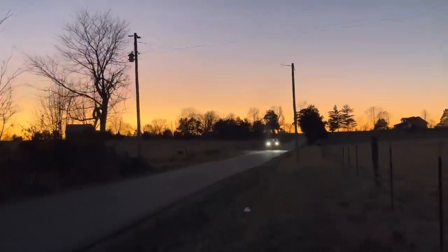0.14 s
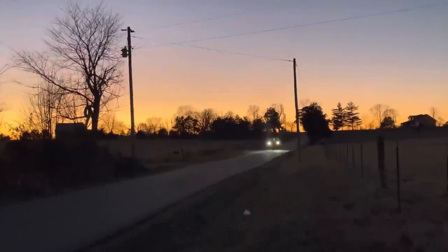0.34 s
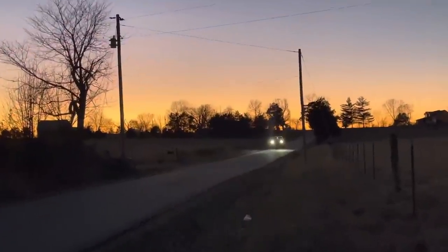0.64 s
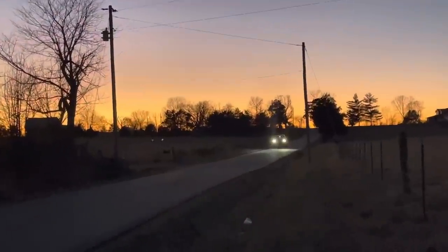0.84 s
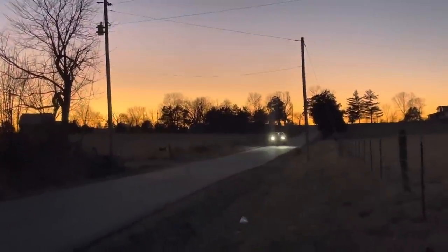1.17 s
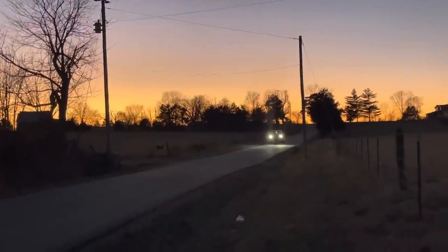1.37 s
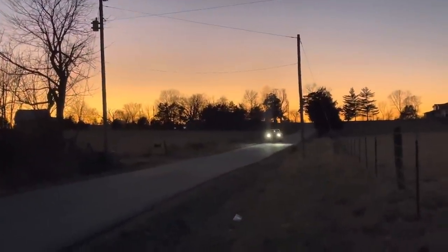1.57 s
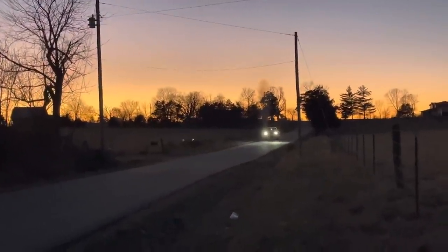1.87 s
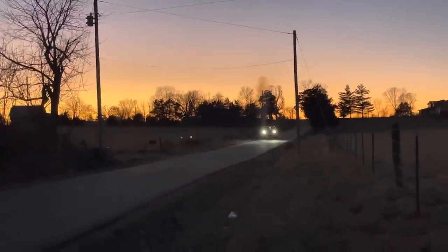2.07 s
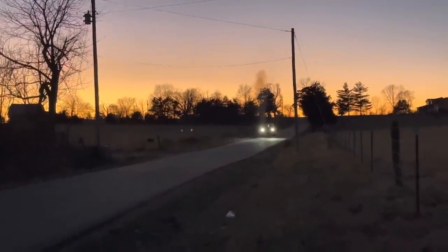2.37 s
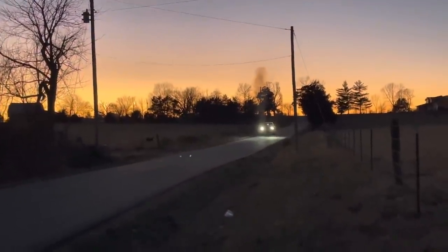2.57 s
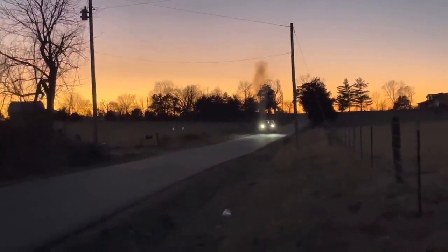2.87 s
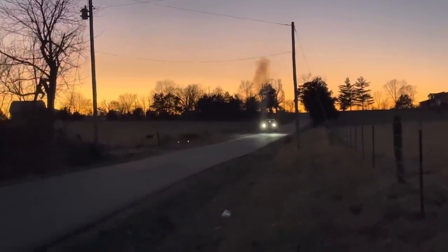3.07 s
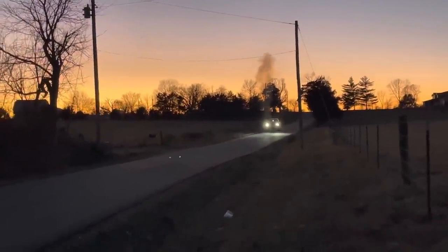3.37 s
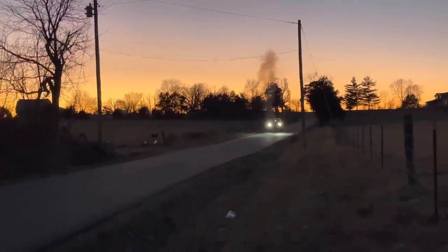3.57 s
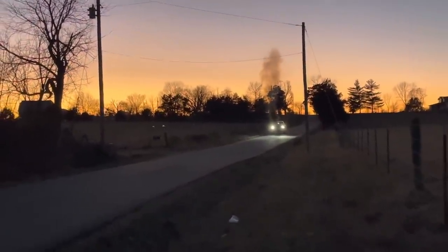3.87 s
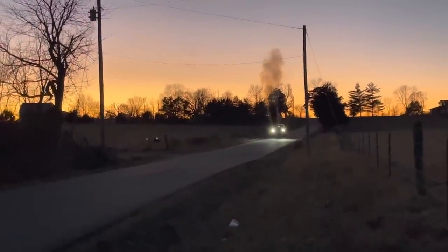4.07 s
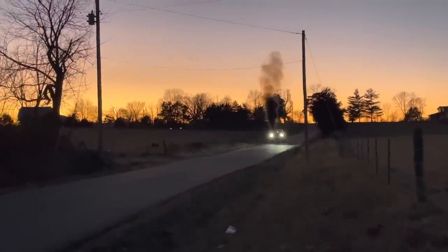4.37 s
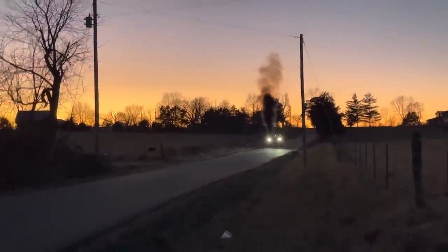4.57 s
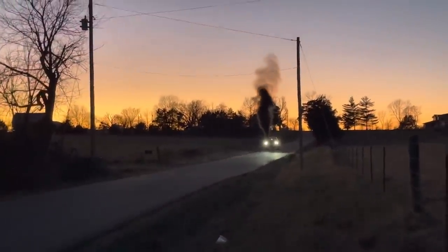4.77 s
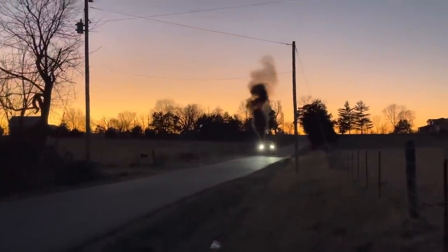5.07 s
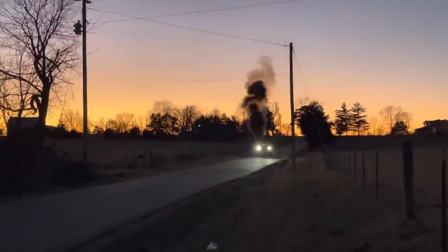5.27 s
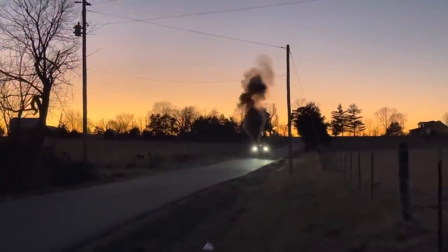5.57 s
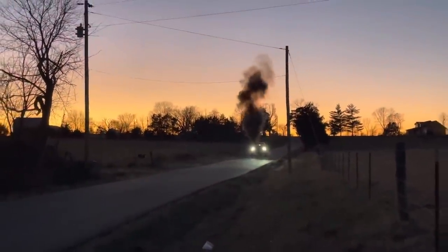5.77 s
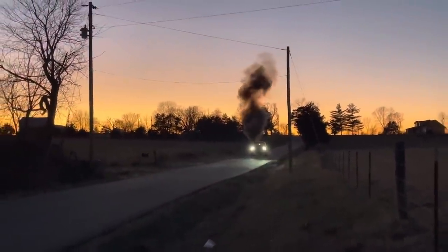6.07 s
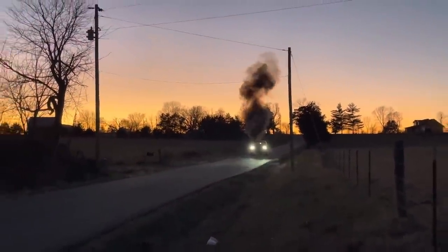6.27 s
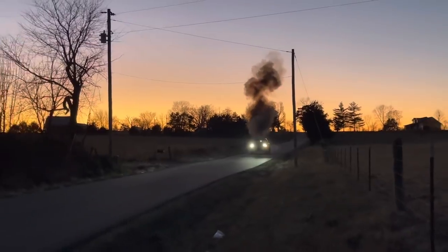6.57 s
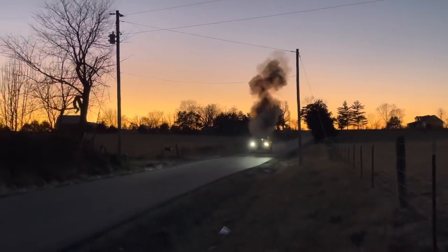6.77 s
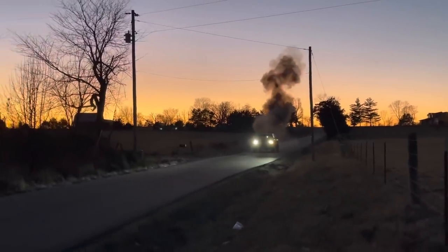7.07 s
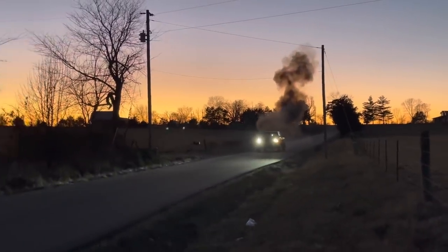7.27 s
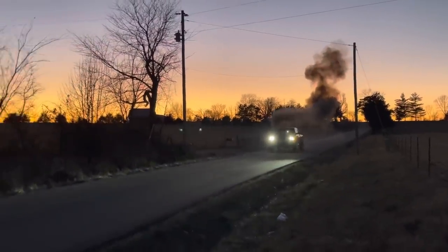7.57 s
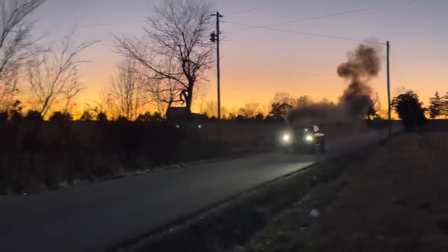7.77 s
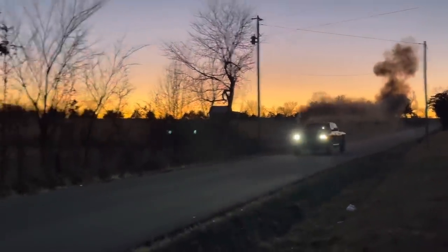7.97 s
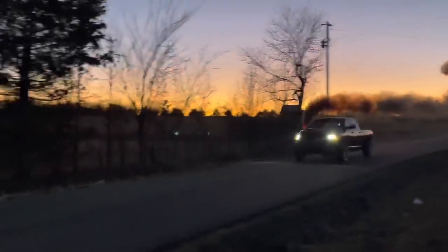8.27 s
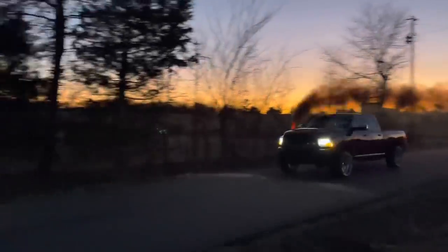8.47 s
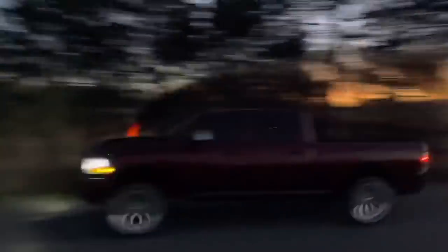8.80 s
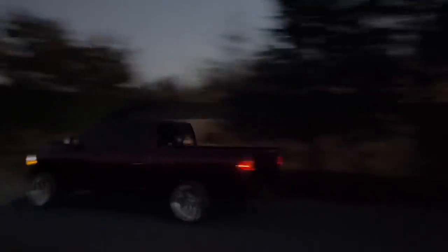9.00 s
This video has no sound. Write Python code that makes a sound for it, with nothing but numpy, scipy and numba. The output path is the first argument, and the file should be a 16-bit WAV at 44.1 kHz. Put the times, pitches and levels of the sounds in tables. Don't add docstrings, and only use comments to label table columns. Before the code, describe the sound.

A rough six-cylinder diesel works up through its revs across an open field, over low air rumble. Small bright clicks of dry grass come early, then a rising turbo whistle and harsh, breathy exhaust. After a mid-course gear dip the engine pulls harder, brighter and closer, colored by a sweeping road echo. It rushes by the phone, drops in pitch and level, and cuts to a dull tail.

```python
import sys
import numpy as np
from scipy import signal
from scipy.fft import rfft, irfft, next_fast_len
from scipy.io import wavfile
from scipy.ndimage import uniform_filter1d
from numba import njit

SR = 44100
rng = np.random.default_rng(int(sys.argv[2]) if len(sys.argv) > 2 else 0)


def amplitude_ratio(level_db):
    exponent = np.asarray(level_db, float) / 20
    return 10 ** exponent


def unload_audio(sound):
    columns = np.transpose(np.atleast_2d(sound))
    steps = np.round(np.clip(columns, -1, 1) * 32767)
    wavfile.write(sys.argv[1], SR, steps.astype(np.int16))


N = 403074


def rms_one(x):
    return x / np.sqrt(np.mean(x ** 2) + 1e-20)


def in_time(rows):
    s, *columns = np.transpose(rows)
    return [np.interp(np.arange(N) / SR, s, c) for c in columns]


def at_hz(points, hz):
    points = np.array(points)
    return np.interp(np.log(hz), np.log(np.maximum(points[:, 0], 1)), points[:, 1])


def drift(rate):
    step = 40
    r = np.exp(-2 * np.pi * step * rate / SR)
    slow = signal.lfilter([1], [1, -2 * r, r * r], rng.standard_normal(N // step + 2002))[2000:]
    return np.interp(np.arange(N) / step, np.arange(len(slow)), rms_one(slow))


@njit
def moving_ring(x, cosine, r):
    y = np.zeros(len(x))
    for i in range(2, len(x)):
        y[i] = x[i] - x[i - 2] + 2 * r * cosine[i] * y[i - 1] - r * r * y[i - 2]
    return y


def resonance(x, hz, width_hz):
    r = np.exp(-np.pi * width_hz / SR)
    return (1 - r * r) / 2 * moving_ring(x, np.cos(2 * np.pi * hz / SR) * np.ones(N), r)


# (pitch [Hz], level [dB per Hz])
RUMBLE_COLOUR = [(40, -17), (70, 0), (110, 6.5), (250, -12.5)]


def rumble(level_db):
    hz = np.maximum(np.fft.rfftfreq(N, 1 / SR), 1)
    shape = amplitude_ratio(at_hz(RUMBLE_COLOUR, hz)) / (1 + (hz / 260) ** 6) / (1 + (30 / hz) ** 2)
    mid, side = irfft(rfft(rng.standard_normal((2, N))) * shape, N)
    return amplitude_ratio(level_db) * rms_one(mid + 0.069 * side * [[1], [-1]])


# (time [s], peak level [dB], pitch [Hz])
STALKS = [
    (1.6282, -19, 6310),
    (1.939, -14, 8340),
    (1.9474, -19, 8490),
    (1.9879, -16, 7500),
    (2.063, -20, 9300),
    (2.0774, -26.5, 7850),
]


def stalk_snaps():
    out, t = np.zeros(N), np.arange(300) / SR
    for s, peak_db, hz in STALKS:
        click = amplitude_ratio(peak_db) * np.exp(-t / 0.0011) * np.sin(2 * np.pi * hz * t)
        out[round(s * SR):][:len(t)] += click
    return out


# (time [s], pitch [Hz], level [dB])
TURBO = [(2.5, 5050, -66), (3.1, 5830, -51), (3.45, 6300, -52), (3.62, 6680, -42), (3.8, 7100, -50),
         (4.0, 7650, -51), (4.15, 8300, -45), (4.45, 9650, -44), (4.6, 10200, -70)]


def turbo():
    hz, level_db = in_time(TURBO)
    wobble = 1 + .003 * drift(60.0)
    flicker_db = 3 * drift(30.0) + 2 * drift(120.0)
    angle = 2 * np.pi * np.cumsum(hz * wobble) / SR
    return np.sqrt(2) * amplitude_ratio(level_db + 3 + flicker_db) * np.sin(angle)


# (time [s], extra path [ms], share [0-1])
ROAD = [(6.5, .56, .03), (6.9, .56, .22), (7.6, .55, .27), (7.9, .62, .36), (8.2, .74, .42),
        (8.35, .82, .36), (8.5, 1.05, .2), (8.65, 1.45, .2), (9.14, 1.35, .2)]


def road_echo(x):
    lag_ms, share = in_time(ROAD)
    dull = signal.butter(1, [300, 4500], "band", fs=SR, output="sos")
    copy = signal.sosfiltfilt(dull, x)

    def late(ms):
        return np.array([np.interp(np.arange(N) - ms * SR / 1000, np.arange(N), c) for c in copy])

    echoes = late(lag_ms) - .6 * late(1.4 * lag_ms)
    return (x + share * echoes) / np.sqrt(1 + share ** 2)


# (time [s], level [dB], brightness [dB per octave])
FLOW = [(0, -2.5, -0.5), (1.4, -0.5, 0.5), (1.9, 2.3, 0.5), (2.2, -1, 2), (2.9, 1.2, 1.5), (3.46, 1.1, 2.5),
        (3.75, 4, 2), (4.5, 4.5, 2), (5.14, 3.5, 0.8), (5.62, 2.95, 2.5), (6.36, 1.5, 3.5),
        (6.62, -4.5, 1.1), (6.95, -0.5, 0.5), (7.92, -3, 0.85), (8.25, -1.5, 0), (8.87, -1.6, -0.4),
        (8.97, -10.5, -4), (9.14, -20.5, -4.5)]
# (start [s], end [s], level [dB], pitch [Hz], width [octaves])
HOWLS = [
    (-2, 0.78, 4.5, 3600, .18),
    (3.5, 4.8, 6, 780, 0.54),
    (3.5, 4.9, 6.5, 1850, 0.45),
    (4.6, 5.35, 5.5, 3200, 0.29),
    (5.8, 6.5, 4, 5200, .4),
    (7.95, 8.4, 4, 1350, .14),
    (8.74, 8.92, 7.5, 5800, 0.32),
]
# (time [s], level [dB], half length [s])
GUSTS = [
    (0.796, 4.5, .07),
    (1.49, 1.5, 0.1),
    (1.634, 7.5, 0.025),
    (1.965, 5.5, .08),
    (2.743, 6.5, .05),
    (3.083, 6, 0.077),
    (3.603, 3, 0.063),
    (6.93, 2.5, .03),
    (8.69, -7, .06),
]
# (pitch [Hz], level [dB per Hz])
FAR_COLOUR = [(150, -50), (250, -70), (365, -4.5), (533, -11), (670, -3), (978, -6), (1550, -17),
              (2150, -8.5), (3410, -15), (6920, -37), (8850, -28), (11500, -32.5), (12700, -83),
              (16500, -103), (22000, -120)]
MID_COLOUR = [(250, -37), (320, -28), (430, -5.5), (870, -6), (1250, -8), (1550, -12.5), (2150, -3),
              (2750, -11), (3400, -9.5), (4300, -20), (5600, -25), (6500, -24), (7600, -28), (8700, -27),
              (11700, -38.5), (13000, -85)]
NEAR_COLOUR = [(150, -41), (250, -21), (285, -7.5), (649, 0), (1400, -1), (1830, -4), (2890, -5), (3300, 4),
               (5060, -8.5), (8850, -6), (10300, -2), (11300, -4), (12700, -34), (16500, -65),
               (22000, -120)]
PASS_COLOUR = [(250, 10), (640, -4), (2150, -10), (3300, -16.5), (5200, -6), (7200, -22), (9000, -2.5),
               (12500, -5), (15500, -72)]
# (firing rate [Hz], depth [0-1])
PUFFING = [(90, 1.13), (125, 0.63), (160, 0.71), (195, 0.74), (230, 0.52)]
# (pitch [Hz], share [0-1])
GATING = [(100, 0), (700, 0.2), (1300, 0.11), (2200, 0.49), (4000, 0.59), (9000, 0.47)]
# (pitch [Hz], likeness [0-1])
LIKENESS = [(60, 0.98), (500, 0.94), (1500, 1), (4000, 0.93), (8000, 1), (12000, 0.59)]


def roar(turns, firing_hz, near):
    t = np.arange(N) / SR
    puff_turns = turns - .28
    strength = amplitude_ratio(2.4 * rng.standard_normal((3, N // 100))[:, np.round(puff_turns).astype(int)])
    puff = strength * ((1 + np.cos(2 * np.pi * puff_turns)) / 2) ** 1.4
    depth = at_hz(PUFFING, firing_hz)
    flow_db, tilt_db = in_time(FLOW)
    howls = []
    for start, end, db, howl_hz, octaves in HOWLS:
        rise = (t - start) / (0.42 * (end - start))
        fall = (end - t) / 0.15
        howls.append((db * np.clip(np.minimum(rise, fall), 0, 1), howl_hz, octaves))
    gust_db = sum(db * np.exp(-((t - s) / half_s) ** 2) for s, db, half_s in GUSTS)
    out, together = 0, drift(4.0)
    edges = 240 * 2 ** np.arange(0, 6.1, 1 / 4)
    white = rng.standard_normal((2, 2, N))
    for k, (low, high) in enumerate(zip(edges, edges[1:])):
        band = signal.butter(2, [low, high], "band", fs=SR, output="sos")
        mid, side = signal.sosfilt(band, white[k % 2])
        hz = np.sqrt(low * high)
        move = flow_db + tilt_db * np.clip(np.log2(hz / 2500), -2, 1.6)
        for howl_db, howl_hz, octaves in howls:
            move = move + howl_db * np.exp(-(np.log2(hz / howl_hz) / octaves) ** 2)
        move = move + gust_db * at_hz([(1540, 0), (7500, 1)], hz)
        colours = [at_hz(c, hz) for c in (FAR_COLOUR, MID_COLOUR, NEAR_COLOUR, PASS_COLOUR)]
        colour_db = np.interp(near, range(4), colours)
        gated = np.clip(depth * at_hz(GATING, hz), 0, 1)
        alike = np.clip(at_hz(LIKENESS, hz), 0, 1)
        gain = amplitude_ratio(colour_db + move + .5 * together + 1.14 * drift(14.0))
        gain = gain * (1 - gated + 2.9 * gated * puff[k // 4 % 3])
        out = out + gain * (np.sqrt(1 + alike) * mid + np.sqrt(1 - alike) * side * [[1], [-1]])
    return amplitude_ratio(-19) * rms_one(out)


# (strength [dB], lateness [firings])
CYLINDERS = [(0, .0), (1.2, -.021), (-1.8, .029), (.3, .002), (1, -.018), (-1.6, .027)]
# (firing rate [Hz], factor [1])
UNEVEN = [(90, 1.05), (125, 1.05), (150, .9), (230, .7)]
# (firing rate [Hz], spread [dB])
JITTER = [(90, .3), (140, .8), (152, 3.5), (180, 4.5), (205, 3.3), (230, 2.5)]
# (firing rate [Hz], level [dB])
BARK = [(90, -19.5), (120, -19.5), (140, -25), (165, -22.5), (195, -22), (225, -27)]


def bark(turns, firing_hz, edge_db, near):
    firing = np.round(turns).astype(int)
    blow_db, late = at_hz(UNEVEN, firing_hz) * np.array(CYLINDERS)[firing % 6].T
    jitter_db = at_hz(JITTER, firing_hz) * rng.standard_normal(N // 100)[firing]
    blows = np.maximum(np.cos(2 * np.pi * (turns - late)), 0) ** 80 * amplitude_ratio(blow_db + jitter_db)
    ring_hz = 504 + 1.57 * firing_hz
    rung = resonance(resonance(blows, ring_hz, 510), ring_hz * 0.92, 730)
    rung = signal.sosfilt(signal.butter(2, 400, "high", fs=SR, output="sos"), rung)
    rung = rung - .35 * resonance(rung, 545, 90)
    even = np.sqrt(uniform_filter1d(rung ** 2, size=6000) + 1e-12)
    bark_db = at_hz(BARK, firing_hz) + 0.7 * edge_db - 2.5 * near
    return -amplitude_ratio(bark_db) * rung / even


# (time [s], firing rate it gives in the first gear [Hz])
SPEED = [(0, 90.28), (1.3, 111.6), (1.52, 112.9), (1.95, 125.5), (2.24, 119.1), (2.62, 119.7),
         (3.33, 138.2), (3.54, 140.9), (4.0, 158.9), (4.53, 190.2), (4.84, 196.6), (5.4, 218.1),
         (5.83, 218.7), (6.21, 224.9), (6.62, 226.2), (7.59, 307.2), (8.3, 359.5), (8.5, 363.3)]
# (start [s], length [s], new over old engine speed [1])
SHIFTS = [
    (6.199, .4, .63),
    (8.889, .25, .61),
]


def firing_rate():
    t = np.arange(N) / SR
    hz, = in_time(SPEED)
    for s, length_s, ratio in SHIFTS:
        done = np.clip((t - s) / length_s, 0, 1) ** 1.45
        hz = hz * (1 - (1 - ratio) * done ** 2 * (3 - 2 * done))
    pass_s, pass_width_s, doppler_drop = 8.8, 0.119, 0.1
    past = (t - pass_s) / pass_width_s
    return hz * (1 - doppler_drop * (1 + past / np.sqrt(1 + past ** 2)) / 2)


# (pitch [Hz], level [dB])
BOOM = [(90, -12.5), (110, -10), (135, -9.5), (155, -10), (175, -12), (195, -16), (218, -20), (230, -22)]
# (pitch [Hz], level [dB])
PIPE = [(250, -73), (310, -65.5), (350, -31.5), (400, -28), (470, -24.5), (570, -26), (750, -23),
        (880, -29.5)]
# (trim [dB], wave steepening against the lowest tone [dB])
OVERTONES = [(0.3, -19), (-0.6, -29), (-5, -27.5)]


def harmonics(firing_hz, load_db, edge_db):
    t = np.arange(N) / SR
    null_db = -7.5 * np.exp(-((t - 8.53) / 0.12) ** 2)
    boom_db = at_hz(BOOM, firing_hz) + load_db + null_db
    behind_db = 22 * np.interp(t, [8.93, 8.99], [0, 1])
    levels = [boom_db]
    for k, (trim_db, steep_db) in enumerate(OVERTONES):
        piped = amplitude_ratio(at_hz(PIPE, (k + 2) * firing_hz) + trim_db + edge_db)
        steepened = amplitude_ratio(boom_db + steep_db + behind_db * (k == 0))
        levels.append(20 * np.log10(piped + steepened))
    return levels


# (firing rate [Hz], lead [radians])
BOOM_LEAD = [(95, 2.4), (108, 1.7), (122, .1)]
# (multiple of firing rate [1], level [dB])
CRANK = [(1 / 3, -30), (1 / 2, -31), (2 / 3, -25), (5 / 6, -32.5), (4 / 3, -34), (5 / 3, -33), (7 / 3, -44),
         (8 / 3, -32), (10 / 3, -30.5), (11 / 3, -32.5)]


def note(turns, firing_hz, harmonics_db, crank_db):
    angle = 2 * np.pi * turns
    lead = at_hz(BOOM_LEAD, firing_hz)
    out = -amplitude_ratio(harmonics_db[0] + .5 * drift(29.0)) * np.cos(angle + lead)
    for k, level_db in enumerate(harmonics_db[1:]):
        out -= amplitude_ratio(level_db + 0.24 * drift(15.0)) * np.sin((k + 2) * angle + 0.54)
    orders = 0
    for multiple, order_db in CRANK:
        level = amplitude_ratio(crank_db + order_db + 2.4 * drift(1.9))
        orders = orders + level * np.sin(multiple * angle + 2 * np.pi * rng.random())
    orders = orders + amplitude_ratio(9.5) * resonance(orders, 445, 62)
    orders = signal.sosfilt(signal.butter(2, 75, "high", fs=SR, output="sos"), orders)
    return np.sqrt(2) * (out + orders)


# (time [s], boom [dB], pulse edge [dB])
LOAD = [(0, 0.2, -1.6), (1.5, -2, -1), (1.96, -0.5, 1.4), (2.3, -2.5, -4.5), (2.62, -4, -2),
        (2.76, 1.5, 1.8), (3.4, -0.7, 1), (3.75, 2.3, 6.5), (5.4, -5.5, -0.7), (6.3, -1, -2.8),
        (6.58, -9, -1), (7.0, -4.5, -5.5), (7.5, -1.4, -2.5), (8.0, -0.5, -2.3), (8.6, 4.5, 2.5),
        (8.86, 3, -2), (9.0, -15, -9), (9.14, -21, -9)]
# (time [s], crank orders [dB], low noise [dB])
RUMBLE = [(0, -27, -29), (3.2, -16, -26), (4.2, -6, -41), (5.2, -12.5, -45), (6.3, -18, -42),
          (7.2, -13, -45), (8.2, -12.5, -39), (8.7, -9.5, -33), (9.14, -29.5, -45)]
# (time [s], nearness [0 far, 1 middle, 2 near, 3 alongside])
NEARNESS = [(0, 0.06), (3.6, 0.075), (4.55, 0.39), (4.8, 0.96), (5.45, 1.12), (5.7, 0.61), (6.4, 1.1),
            (6.9, 1.525), (8.66, 2.014), (8.76, 2.46), (9.14, 2.8)]
# (time [s], left over right [dB])
BEARING = [(0, 7.05), (7.5, 7), (7.92, 5.8), (8.2, 3.5), (8.63, 3), (8.73, 8), (8.86, 5.5), (9.05, 8)]


def scene():
    firing_hz = firing_rate()
    turns = np.cumsum(firing_hz) / SR
    load_db, edge_db = in_time(LOAD)
    crank_db, rumble_db = in_time(RUMBLE)
    near, = in_time(NEARNESS)
    pan_db, = in_time(BEARING)
    pan_db = pan_db - np.mean(pan_db)
    background = rumble(rumble_db) + stalk_snaps()
    hiss = road_echo(roar(turns, firing_hz, near))
    pipe = bark(turns, firing_hz, edge_db, near)
    pipe = pipe + note(turns, firing_hz, harmonics(firing_hz, load_db, edge_db), crank_db)
    truck = pipe + hiss + turbo()
    return truck * amplitude_ratio([pan_db / 2, -pan_db / 2]) + background


def top_cut(x):
    return signal.sosfilt(signal.butter(12, 15700, fs=SR, output="sos"), x)


# (pitch [Hz], left over right [dB])
PORT_DB = [(60, 0.5), (110, 0.5), (200, 1.0), (350, 0.5), (640, 0.0), (1150, -0.5), (2080, -2.0),
           (3760, -1.0), (6790, 0.0), (12300, 0.0)]
# (pitch [Hz], left leads by [radians])
PORT_LEAD = [(0, 0), (1640, -0.1), (2760, 0.1), (3010, 0.7), (4220, 0.3), (4740, 0.6), (5600, 0.0),
             (7320, 0.0), (7750, 0.2), (8790, -0.1), (9730, -2.6), (10900, -4.0), (11500, -6.2),
             (12400, -6.3)]
# (pitch [Hz], level [dB])
PORT_NOTCH = [(9700, -0.5), (10200, -15), (10600, -6)]
# (time [s], drop [dB], recovery [s])
DUCKS = [
    (4.259, 0.5, 0.13),
    (4.45, 2, 0.068),
    (4.629, 4, 0.084),
    (4.874, 1.5, 0.24),
    (5.383, 2, 0.22),
    (7.765, 2, 0.13),
    (8.204, 3, 0.31),
    (8.425, 3, 0.25),
    (8.612, 4, 0.087),
]


def record(dry):
    size = next_fast_len(N)
    hz = np.maximum(np.fft.rfftfreq(N, 1 / SR), 1) if size == N else np.maximum(np.fft.rfftfreq(size, 1 / SR), 1)
    port = amplitude_ratio(at_hz(PORT_DB, hz) / 2) * np.exp(.5j * at_hz(PORT_LEAD, hz))
    spectrum = rfft(dry, size) * [port, 1 / port] * amplitude_ratio(at_hz(PORT_NOTCH, hz))
    x = irfft(spectrum, size)[:, :N]
    t = np.arange(N) / SR
    gain_db = 0.55
    for s, drop_db, back_s in DUCKS:
        gain_db = gain_db - drop_db * (t > s) * np.exp(-np.maximum(t - s, 0) / back_s)
    return top_cut(np.tanh(x * amplitude_ratio(gain_db)))


dry = scene()
out = record(dry)
unload_audio(out)
```